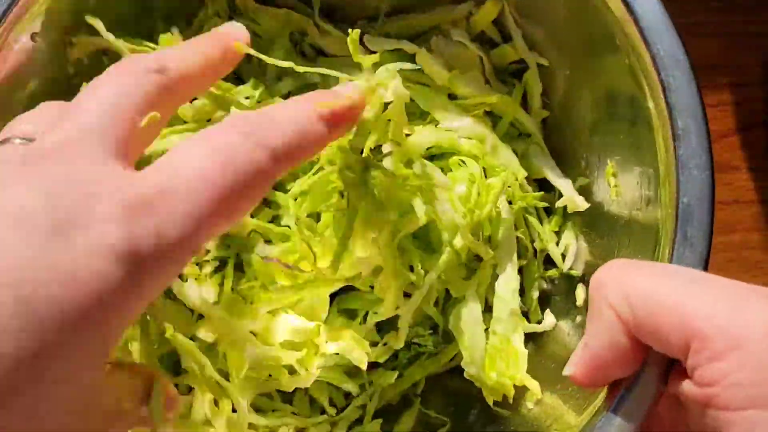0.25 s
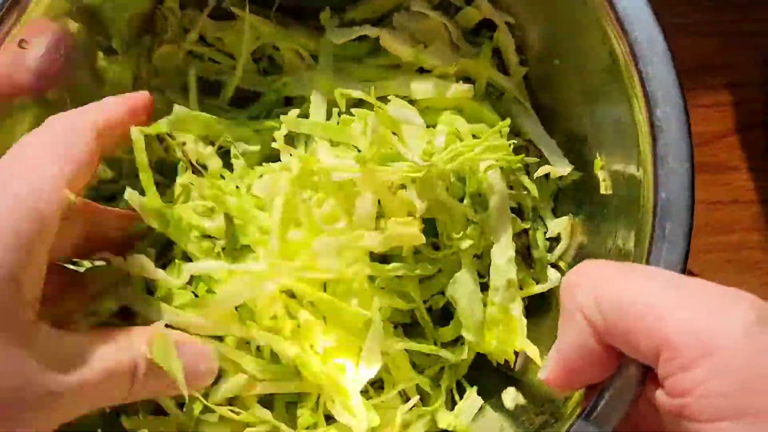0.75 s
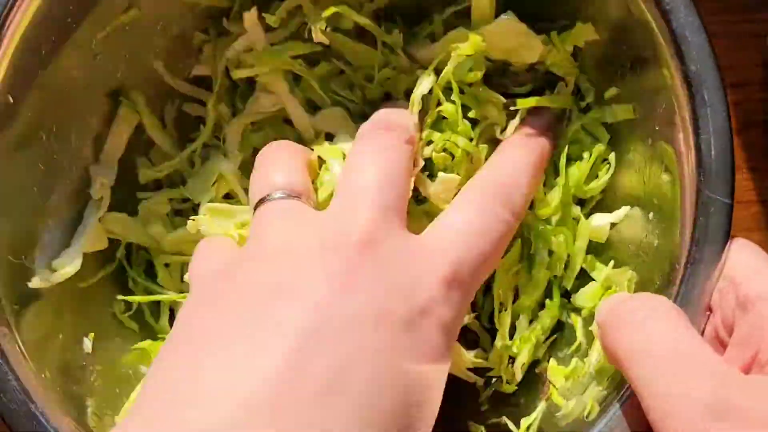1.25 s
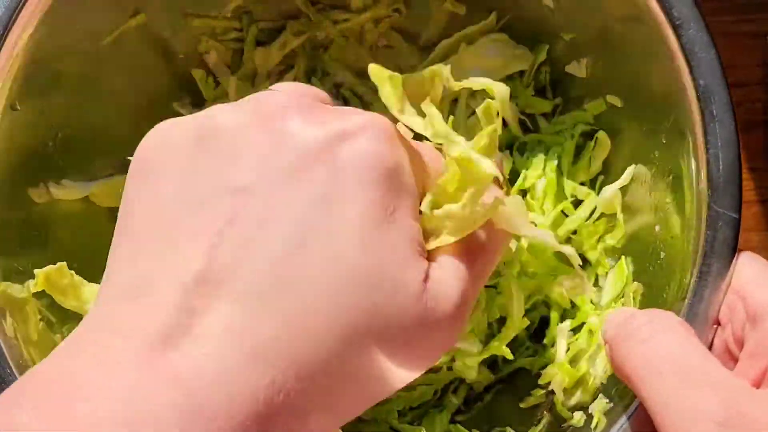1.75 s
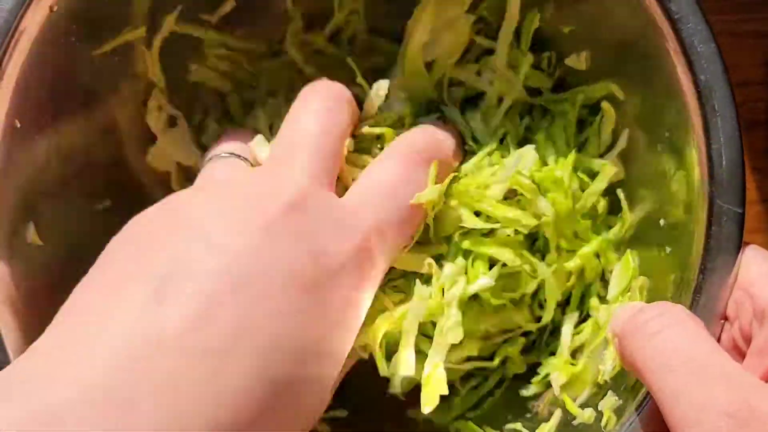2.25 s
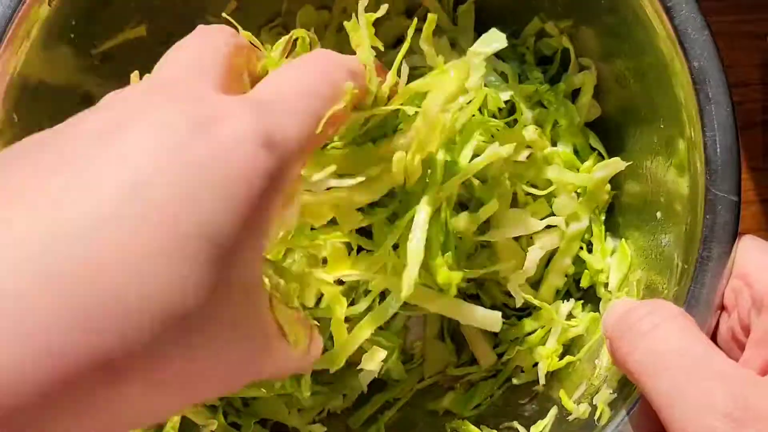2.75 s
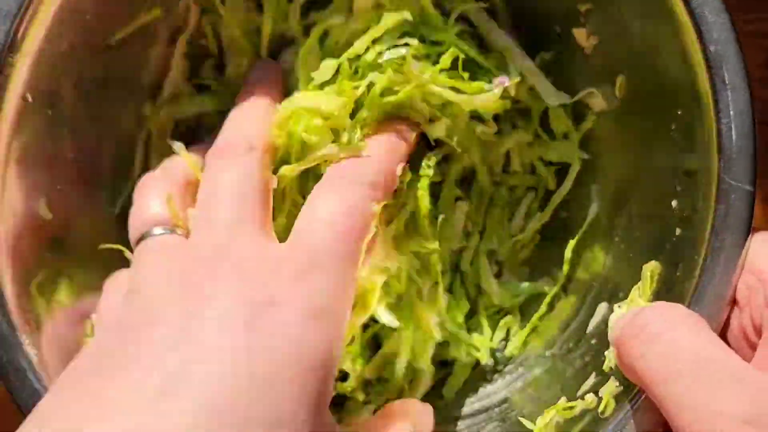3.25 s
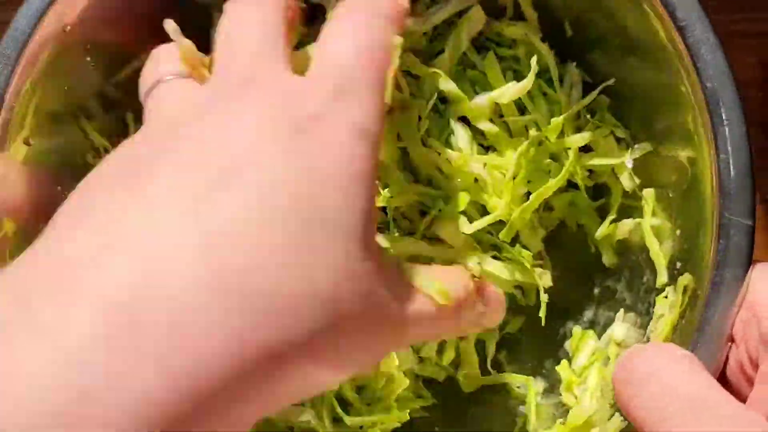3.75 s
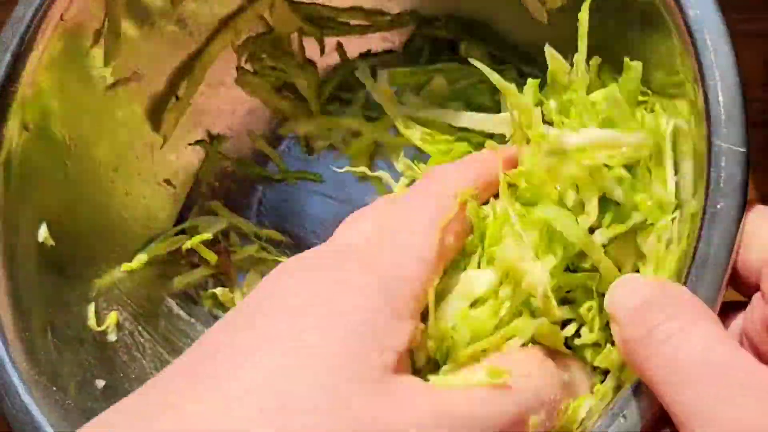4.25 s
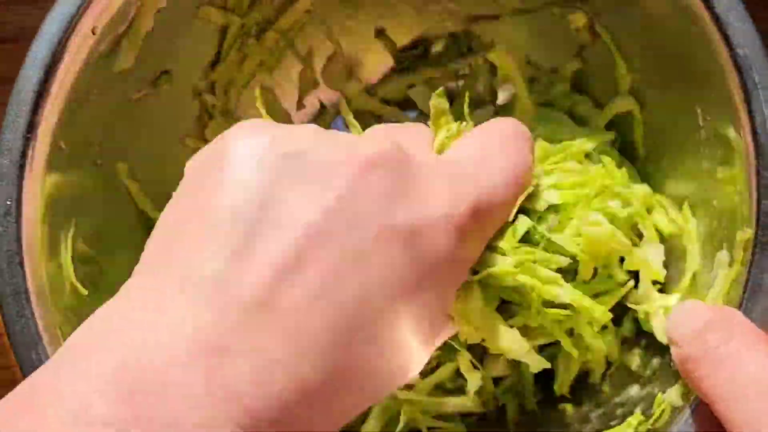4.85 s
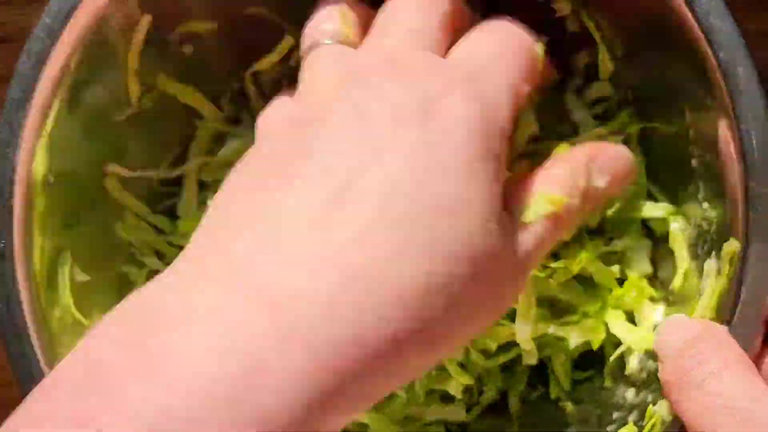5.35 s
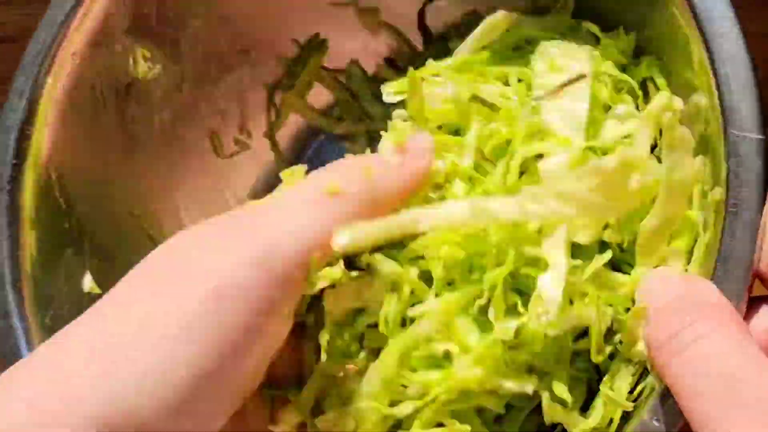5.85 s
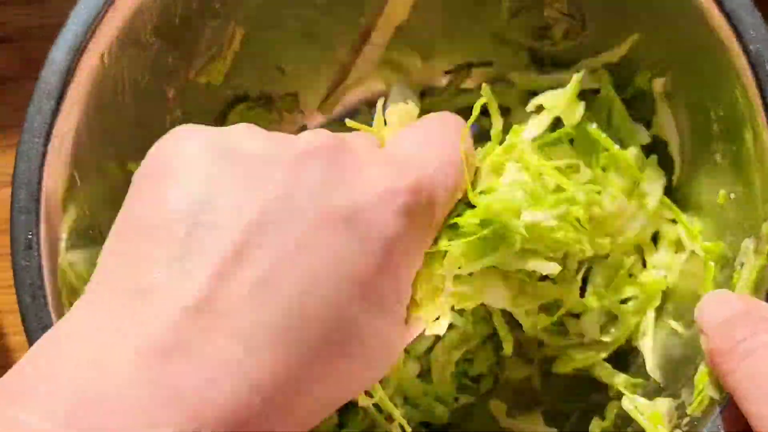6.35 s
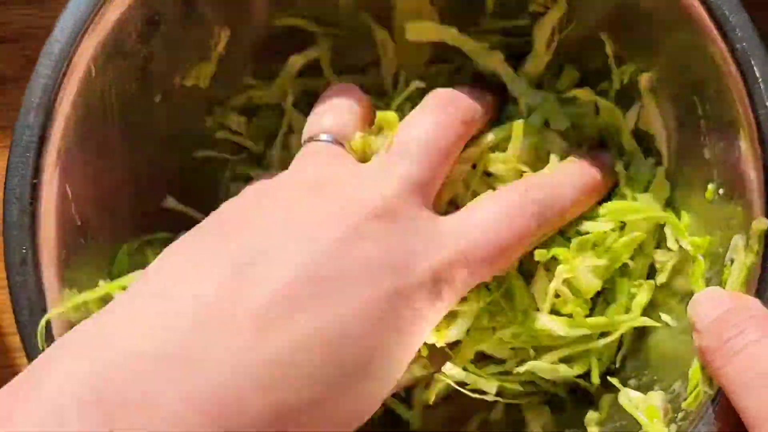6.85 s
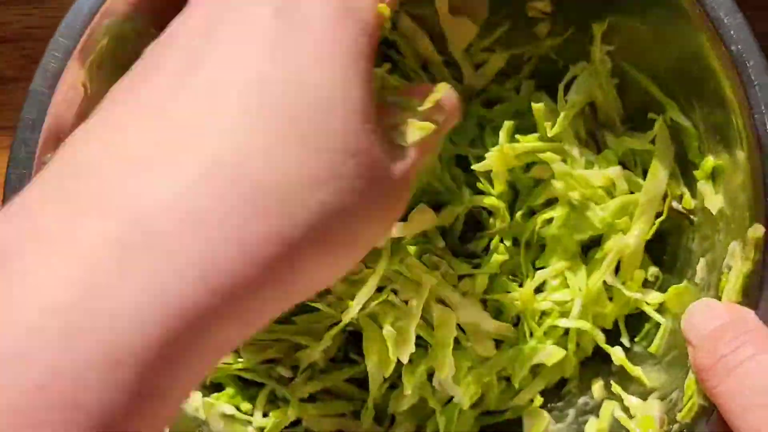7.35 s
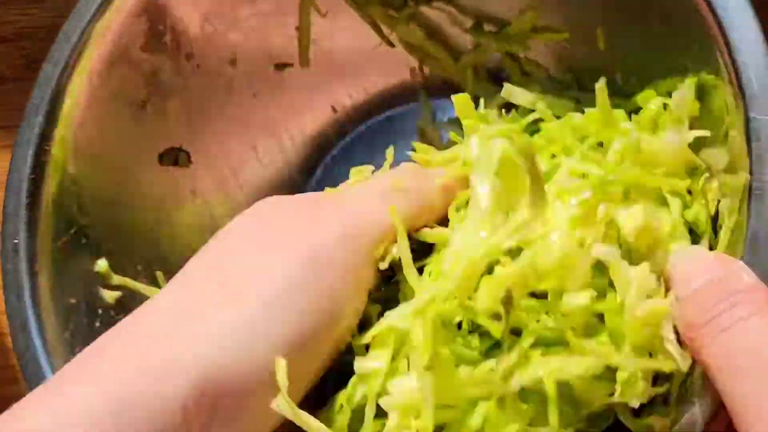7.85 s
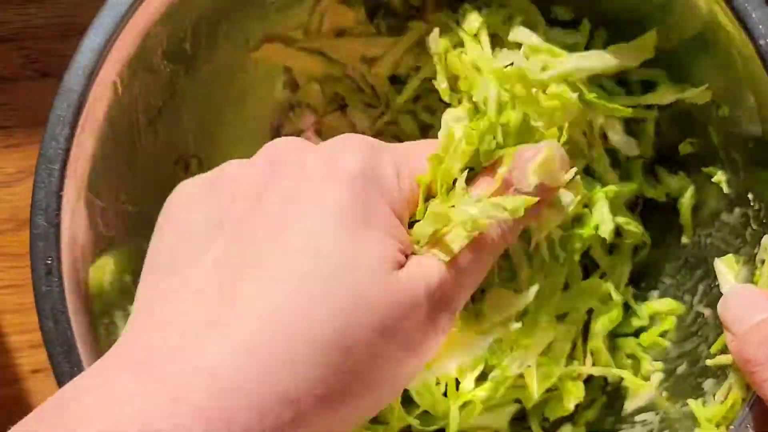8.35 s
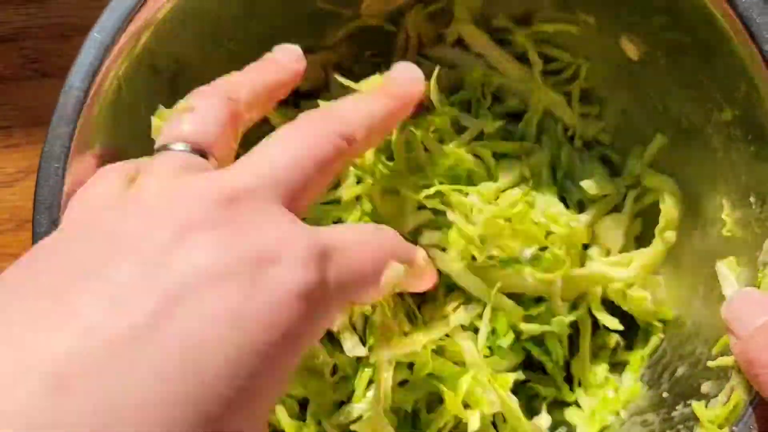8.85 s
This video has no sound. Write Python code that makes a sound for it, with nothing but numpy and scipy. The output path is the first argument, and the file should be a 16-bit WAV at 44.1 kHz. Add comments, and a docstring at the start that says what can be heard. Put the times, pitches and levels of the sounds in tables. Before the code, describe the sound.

In a quiet, faintly humming kitchen, wet cabbage shreds are tossed and squeezed by hand in a metal bowl, heard close up. Light rustling at the start grows busier, alternating with crackly crunches as handfuls are crushed and the ribs break. Clumps drop with little wet slaps, fingers scrape and bump the steel with a damped ring and a couple of tiny squeaks, and the wooden table thumps softly below.

```python
"""First comes a short crunch and scrape over a quiet kitchen hum: a hand is tossing and squeezing
shredded cabbage in a steel bowl on a wooden table, close to a stereo microphone. Wet shreds fizz
as they slide and slap as they fall; under pressure, fibres and ribs fracture and water bubbles out.
Fingers rub, knock and squeak on the steel, exciting its damped modes, and the table thumps below."""
import sys
import numpy as np
from scipy import signal
from scipy.fft import rfft, irfft, next_fast_len
from scipy.io import wavfile
from scipy.ndimage import uniform_filter1d

SR = 44100
rng = np.random.default_rng(int(sys.argv[2]) if len(sys.argv) > 2 else 0)


def digitize_waveform(pressure):
    """Quantize a signal to 16-bit integers and store it at the path in sys.argv[1].

    Rows of a 2-D input are taken as channels; values are limited to [-1, 1].
    """
    field = np.atleast_2d(pressure).T
    bounded = np.clip(field, -1, 1)
    quanta = np.round(bounded * 32767).astype(np.int16)
    wavfile.write(sys.argv[1], SR, quanta)


N = 401751

# The hand digs or turns the heap: (start [s], length [s], rustle [dB], crunch [dB], rub [dB])
HAND_STROKES = [(0.0, .06, -67.5, -54, -53), (0.096, .1, -70.5, -68.5, -66.5), (0.576, .2, -67, -77, -69.5),
                (0.801, .09, -55.5, -63.5, -50.5), (1.009, 0.072, -66.5, -78, -72.5),
                (1.174, 0.019, -71.5, -77, -78.5), (1.263, 0.046, -62.5, -60.5, -57),
                (1.323, .12, -66.5, -65, -57), (1.638, .03, -79.5, -61, -57.5),
                (1.772, .13, -77, -56, -66.5), (2.103, 0.074, -91.5, -71, -73.5),
                (2.198, .04, -65.5, -62, -58), (2.286, .1, -54.5, -56.5, -50.5),
                (2.521, .1, -62, -58.5, -70), (2.643, .06, -65, -61, -62.5),
                (2.966, 0.03005, -89, -72.5, -60), (3.027, .022, -53, -55, -55),
                (3.09, .08, -64, -79, -75.5), (3.236, .05, -66, -67.5, -62.5),
                (3.315, .165, -50.5, -59.5, -49), (3.501, .1, -67.5, -70, -62.5),
                (3.662, .17, -64.5, -70, -63.5), (3.821, .14, -55, -66, -55.5),
                (4.055, .15, -54.5, -61, -60.5), (4.193, .15, -54, -60.5, -45),
                (4.424, 0.037, -71.5, -70, -57.5), (4.464, .09, -51.5, -65, -53.5),
                (4.625, 0.034, -65, -74, -67), (4.714, .1, -53, -65, -52),
                (5.072, 0.064, -57.5, -60, -63.5), (5.29, .055, -55, -67, -61),
                (5.385, .055, -55, -67.5, -59.5), (5.438, 0.11, -56, -67.5, -58.5),
                (5.598, 0.26, -54.5, -66, -58.5), (5.801, .08, -55, -57.5, -48.5),
                (5.957, 0.078, -67, -64.5, -47.5), (6.029, 0.042, -47, -64.5, -52),
                (6.212, .1, -52.5, -63, -52), (6.463, .1, -59.5, -53.5, -62),
                (6.723, 0.035, -68.5, -75.5, -75.5), (6.843, .1, -48, -62.5, -53),
                (7.408, .2, -56.5, -72.5, -58.5), (7.647, 0.052, -56, -71, -62.5),
                (7.973, .03, -66.5, -68.5, -56), (8.041, .03, -61.5, -65, -56),
                (8.438, .07, -62.5, -58, -57), (8.599, 0.11, -84.5, -70.5, -68.5),
                (8.716, .12, -65.5, -71, -67), (8.984, .13, -64.5, -73, -62.5)]
# The fist closes: (tightest at [s], crunch [dB], rustle [dB], rub [dB], lead of the rub's peak [s])
FIST_SQUEEZES = [(0.601, -65.5, -64.5, -62.5, .01), (1.57, -49.5, -60, -52.5, .19),
                 (2.458, -46, -62, -45, .12), (4.891, -45.5, -55, -45, .07),
                 (6.36, -47.5, -61, -50.5, 0.063), (7.05, -49.5, -56, -47, .055),
                 (7.8, -60, -52.5, -52, -0.018), (8.37, -53, -62.5, -53, -.04)]
# Noise spectra: (frequency [Hz], relative density [dB])
RUSTLE_SPECTRUM = [(3500, -103), (5600, -1.5), (6500, 2), (7500, 10), (9000, 3), (11300, -2.5), (14400, 1),
                   (16000, -5)]
CRUNCH_SPECTRUM = [(1000, -27), (2000, -2), (3200, 3.5), (5000, -3.5), (6500, -0.5), (12000, -10)]
KITCHEN_SPECTRUM = [(15, -26), (25, -13), (76, -35), (185, -37), (235, -5), (290, 4), (380, -5.5),
                    (962, -15), (1700, -21.5), (2550, -19.5), (3250, -29.5), (16000, -42)]
SLAP_SPECTRUM = [(3500, -74), (5300, -1), (6200, 6), (7500, 17), (9000, 7), (12000, 2), (16000, -2)]
# Resonances: (centre [Hz], bandwidth [Hz], relative gain [dB])
BOWL_MODES = [(492, 40, -8), (586.7, 20, 5), (682.3, 20, 3), (823, 36, -1), (1090, 36, -1), (1212, 36, 0),
              (1480, 50, -4), (1710, 40, -6), (1900, 34, -6), (2110, 36, -7), (2610, 1020, -19)]  # the damped steel wall
FINGER_BAND = [(975, 2230, 0)]  # soft fingers excite the highest modes less
FOOT_MODES = [(144, 300, -3.5), (240, 111, 11.5), (330, 394, 3)]  # the bowl's foot on the wood
CRACK_BANDS = [(3540, 3400, 4.5), (10200, 22000, 0.5)]  # the noisy edge of dull cracks, then of bright ones
# Fingers and clumps strike the bowl: (time [s], level [dB], pitch [Hz])
BOWL_KNOCKS = [(0.03, -46, 656), (0.09, -55, 590), (0.806, -45.5, 600), (0.854, -39, 576),
               (0.881, -47, 646), (1.135, -57.5, 676), (1.267, -45.5, 322), (1.394, -38.5, 632),
               (1.59, -40.5, 1136), (1.643, -47.5, 850), (2.488, -44.5, 1160), (2.69, -51.5, 676),
               (2.201, -43.5, 350), (2.968, -46.5, 1320), (3.243, -51, 365), (3.029, -35.5, 387),
               (3.319, -36, 640), (3.887, -38.5, 412), (4.052, -45.5, 404), (4.202, -36, 1080),
               (4.2225, -31.5, 724), (4.282, -52, 614), (4.325, -47, 610), (4.347, -40.5, 900),
               (4.489, -44, 590), (4.52, -49, 660), (4.709, -40.5, 380), (4.797, -32.5, 786),
               (4.838, -34.5, 676), (4.934, -42, 620), (5.08, -46.5, 435), (5.294, -47, 352),
               (5.45, -41, 254), (5.611, -43.5, 397), (5.64, -49.5, 268), (5.809, -55, 800),
               (5.863, -41, 590), (5.964, -40.5, 600), (5.976, -55, 670), (6.033, -34, 750),
               (6.061, -48, 910), (6.226, -36, 604), (6.274, -31, 640), (6.688, -50.5, 580),
               (6.845, -39.5, 410), (6.96, -29.5, 1220), (7.0073, -28, 560), (7.035, -51, 646),
               (7.403, -46, 400), (7.653, -44, 407), (7.686, -49, 393), (7.789, -34.5, 634),
               (7.814, -39, 632), (7.838, -46, 640), (7.885, -46.5, 1210), (7.978, -40, 1326),
               (8.048, -44.5, 567), (8.265, -56, 600), (8.398, -43, 654), (8.495, -44.5, 670)]
# Wet clumps slap down or tear loose: (time [s], level [dB])
CLUMP_SLAPS = [(0.814, -32), (1.178, -30.5), (1.263, -33), (1.596, -27), (1.808, -16.5), (2.2, -28.5),
               (3.034, -36), (3.3174, -20.5), (3.412, -33), (3.4557, -24.5), (3.665, -25), (3.684, -26),
               (3.717, -41), (3.752, -27.5), (3.821, -41), (3.887, -22), (4.05, -36), (4.4824, -25.5),
               (4.635, -30), (4.707, -27), (5.013, -24.5), (5.29, -33), (5.449, -27.5), (5.61, -37),
               (5.765, -21.5), (6.042, -17), (6.391, -24), (6.471, -32), (6.728, -30.5), (6.843, -27),
               (7.403, -32.5), (7.652, -38), (8.0475, -30)]
# Weight comes down on the table: (time [s], level [dB])
TABLE_THUMPS = [(0.825, -71), (2.261, -65), (3.451, -67.5), (3.881, -75), (4.065, -68), (4.724, -54),
                (5.314, -66), (5.614, -70), (6.28, -57.5), (6.852, -69), (6.944, -62.5), (7.405, -63),
                (7.667, -68.5)]
# Water escapes from under a clump: (start [s], length [s], level [dB], lowest pitch [Hz])
BUBBLE_RUNS = [(1.266, 0.026, -41.5, 6000), (4.07, 0.032, -43.5, 5700), (5.291, 0.047, -41, 5700),
               (5.619, 0.018, -42, 5550), (7.652, 0.058, -40, 5880)]
# Leaf ribs break: (time [s], level [dB], pitch [Hz])
RIB_CRACKS = [(1.4698, -34, 3450), (1.4877, -30, 3500), (1.5385, -37, 4360), (1.572, -27, 4550),
              (1.5932, -21.5, 3700), (1.642, -32.5, 6400), (1.8096, -19.5, 7100), (2.3538, -36, 3040),
              (2.381, -35, 4500), (2.392, -40, 6000), (2.412, -33, 10000), (2.437, -33, 4860),
              (2.468, -30, 6060), (2.492, -29.5, 4220), (2.563, -36, 4360), (2.58, -49, 12000),
              (2.611, -46, 6000), (3.03, -29.5, 5970), (3.031, -33.5, 2470), (3.32, -27.5, 6150),
              (3.435, -31.5, 3280), (4.8033, -26.5, 7800), (4.8247, -31, 3420), (4.8532, -25, 3130),
              (4.887, -33, 3860), (4.9, -29.5, 2440), (4.9656, -27.5, 6540), (5.005, -26, 3760),
              (5.009, -34, 7000), (5.018, -27, 6100), (5.085, -38.5, 7360), (6.275, -32, 2530),
              (6.3783, -25.5, 3270), (6.3905, -21.5, 7100), (6.472, -29.5, 3540), (6.9503, -35.5, 1900),
              (7.043, -32, 3520), (7.048, -27.5, 4800), (7.061, -38, 6400), (7.066, -31, 2650),
              (7.1045, -30.5, 5400), (8.3585, -21, 6540), (8.3577, -19, 4060), (8.3863, -30, 3020),
              (8.4455, -31.5, 3180)]
# Wet fingertips chatter on steel: (start [s], length [s], level [dB], lowest pitch [Hz])
FINGER_SQUEAKS = [(2.315, 0.038, -29.5, 1450), (4.128, .022, -36, 1450)]
# The room's reverberation: (frequency [Hz], time to fall 60 dB [s])
ROOM_DECAY = [(300, 0.079), (3000, 0.044), (12000, 0.0027)]

SIZE_FLOOR = .03  # limits the size of the biggest random grains


def amp(db):
    """Amplitude ratio of a level in decibels."""
    return 10 ** (np.asarray(db) / 20)


def along(points, hz):
    """Interpolation of (frequency, value) points on a logarithmic frequency axis."""
    f, v = np.transpose(points)
    return np.interp(np.log(hz + 1), np.log(f + 1), v)


def filtered(x, response):
    """Linear filtering, normalised so that white noise keeps its power."""
    m = next_fast_len(N + SR // 2)
    h = response(np.fft.rfftfreq(m, 1 / SR))
    return irfft(rfft(x, m) * h / np.sqrt(np.mean(np.abs(h) ** 2)), m)[..., :N]


def colour(points):
    """Zero-phase response of a smooth spectrum."""
    return lambda hz: amp(along(points, hz))


def modes(table):
    """Modal superposition: second-order resonators summed with alternating sign."""
    return lambda f: sum((-1) ** k * amp(db) * 1j * f * width / (hz * hz - f * f + 1j * f * width)
                         for k, (hz, width, db) in enumerate(table))


def nearest_mode(hz):
    """The bowl's natural frequency closest to each pitch."""
    tones = np.transpose(BOWL_MODES)[0]
    return tones[np.abs(np.log(hz[:, None] / tones)).argmin(axis=1)]


def stereo_noise(correlation):
    """Partially coherent white noise in two channels."""
    mid, side = rng.standard_normal((2, N))
    angle = np.arccos(correlation) / 2
    return np.cos(angle) * mid + np.sin(angle) * side * np.array([[1], [-1]])


def placed(x, lag_s, left_db):
    """Path difference: the left channel lags, by one cycle at most, and is left_db above the right."""
    m = next_fast_len(N + 512)
    lag_cycles = np.minimum(np.fft.rfftfreq(m, 1 / SR) * lag_s, 1)
    left = irfft(rfft(x[0], m) * np.exp(-2j * np.pi * lag_cycles), m)[:N]
    return np.array([left * amp(left_db / 2), x[1] * amp(-left_db / 2)])


def unit(x):
    """Normalisation to rms 1."""
    return x / np.sqrt(np.mean(x ** 2) + 1e-20)


def grains(per_s, spread_db, t60, steady, rise_s):
    """Shot-noise envelope of rms 1: random pulses of uneven size over a steady share."""
    chance, size = rng.random((2, N))
    kicks = (chance < per_s / SR) * amp(-spread_db * np.log(size + SIZE_FLOOR))
    decaying = signal.lfilter([1], [1, -amp(-60 / (t60 * SR))], kicks)
    rounded = signal.lfilter([1], [1, -np.exp(-1 / (rise_s * SR))], decaying)
    return unit(steady + unit(rounded))


def bursts(times, dbs, t60, rise_s, stretch=0.88):
    """Envelope of sudden onsets with stretched-exponential decay."""
    out, t = np.zeros(N + SR), np.arange(SR // 4) / SR
    for s, db in zip(times, dbs):
        out[round(s * SR):][:len(t)] += amp(db - 60 * (t / t60) ** stretch) * (1 - np.exp(-t / rise_s))
    return out[:N]


def pings(times, dbs, hz, cycles, rise):
    """Damped oscillators that lose 60 dB in so many cycles; the rise is also in cycles."""
    hz = np.asarray(hz)[:, None]
    k = np.arange(int(cycles * SR / hz.min()) + 2)
    turns = k * hz / SR
    envelope = amp(dbs[:, None] - 60 * turns / cycles) * (1 - np.exp(-turns / rise))
    wave = envelope * np.sin(2 * np.pi * turns)
    at = np.round(times * SR).astype(int)[:, None] + k
    return np.bincount(at.ravel(), wave.ravel(), N + len(k) + SR)[:N]


def patter(drive, hz, octaves, db, spread_db, cycles, count, tune=np.asarray):
    """A random point process of pings, denser and bigger as the drive grows."""
    when, size = rng.random((count, 2)).T
    activity = np.cumsum(drive ** .8)
    at = np.searchsorted(activity, when * activity[-1])
    size_db = db - spread_db * np.log(size + SIZE_FLOOR) + 20 * np.log10(drive[at])
    pitch = tune(hz * 2 ** np.clip(octaves * rng.standard_normal(count), -1, 1))
    return pings(at / SR, size_db, pitch, cycles, rise=0.44)


def runs(table, fall, scatter, cycles, count):
    """Fading runs of damped oscillations, scattered above each row's pitch and sinking by a share."""
    start, length, db, hz = np.transpose(table)[:, :, None]
    progress = rng.random((len(start), count))
    detune, size = rng.standard_normal((2, len(start), count))
    pitch = hz * (1 + fall * np.exp(-4 * progress) + np.minimum(scatter * abs(detune), 1))
    levels = db - 6 * progress + 3 * size
    return pings((start + length * progress).ravel(), levels.ravel(), pitch.ravel(), cycles, rise=0.71)


def swell(t, rise, fall, round_s):
    """Exponential growth and decay [dB/s] about a rounded peak at t = 0."""
    return amp(-np.where(t < 0, rise, fall) * (np.hypot(t, round_s) - round_s))


def hand():
    """Incoherent addition: strokes, squeezes and the settling heap sum in power to three gains."""
    t = np.arange(N) / SR
    attack_s, sag_db_per_s, release_db_per_s = .002, 30, 240
    power = np.ones((3, N)) * amp([[-83.5], [-80], [-73.5]]) ** 2  # rustle, crunch, rub at rest
    for s, length, *dbs in HAND_STROKES:
        at = slice(round(s * SR), round((s + length) * SR) + SR // 3)
        age = t[at] - s
        fade = amp(-sag_db_per_s * age - release_db_per_s * np.maximum(age - length, 0))
        power[:, at] += (amp(dbs)[:, None] * np.clip(age / attack_s, 0, 1) * fade) ** 2
    for s, crunch_db, rustle_db, rub_db, lead in FIST_SQUEEZES:
        at = slice(max(round(s * SR) - SR // 2, 0), round(s * SR) + SR // 2)
        grip = swell(t[at] - s, rise=140, fall=120, round_s=0.02)
        press = swell(t[at] - s + lead, rise=160, fall=140, round_s=0.03)
        power[:, at] += (amp([[rustle_db], [crunch_db], [rub_db]]) * [grip, grip, press]) ** 2
    return np.sqrt(power)


def sliding_shreds(rustle, crunch):
    """Friction between wet shreds radiates a bright fizz of noise and tiny ticks."""
    crackle = grains(per_s=160, spread_db=6.5, t60=0.046, steady=0.79, rise_s=0.0023)
    fizz = filtered(rustle * amp(2) * crackle * stereo_noise(0.91), colour(RUSTLE_SPECTRUM))
    ticks = patter(rustle, 8050, octaves=0.12, db=-1, spread_db=4.5, cycles=20, count=900)
    fine_ticks = patter(crunch, 11100, octaves=0.35, db=1, spread_db=5.5, cycles=6.5, count=1200)
    return fizz + ticks + fine_ticks


def breaking_fibres(crunch):
    """Brittle fracture: squeezed fibres break one by one, and their pulses merge into a crunch."""
    breaks = grains(per_s=580, spread_db=5, t60=0.015, steady=0.8, rise_s=0.0003)
    noise = filtered(crunch * amp(1.5) * breaks * stereo_noise(0.05), colour(CRUNCH_SPECTRUM))
    return noise + patter(crunch, 3600, octaves=0.41, db=1.5, spread_db=7, cycles=9.4, count=2200)


def bowl_wall(rub, slips):
    """Modal response: stick-slip rubbing, knocks and falling shreds ring the steel wall."""
    s, db, hz = np.transpose(BOWL_KNOCKS)
    cutoff_hz, ring_cycles = 470, 42  # the wall hardly sounds below its lowest mode

    def response(f):
        return modes(BOWL_MODES)(f) * modes(FINGER_BAND)(f) / (1 + (cutoff_hz / (f + 1)) ** 10)

    force = slips + bursts(s, db + 7.5, t60=0.0086, rise_s=0.00018)
    body = filtered(force * stereo_noise(0.41), response)
    knocks = pings(s, db + 8, hz, cycles=8.8, rise=0.54)
    ring_db = db - 2 - 8.5 * (hz < cutoff_hz)  # soft, low knocks ring less
    ring = pings(s, ring_db, nearest_mode(hz), ring_cycles, rise=2.2)
    shreds = patter(rub, 720, octaves=0.4, db=-2, spread_db=2.5, cycles=ring_cycles, count=500,
                    tune=nearest_mode)
    return body + knocks + ring + shreds


def bowl_foot(slips):
    """Mechanical coupling: low knocks, and faintly the rubbing, push the bowl's foot on the wood."""
    s, db, hz = np.transpose(BOWL_KNOCKS)
    corner_hz, db_per_octave = 339, 30.7
    push_db = db - 1.5 - db_per_octave * np.maximum(np.log2(hz / corner_hz), 0)
    force = bursts(s, push_db, t60=0.16, rise_s=0.000066) + amp(-34.5) * slips
    return filtered(force * stereo_noise(1), modes(FOOT_MODES))


def kitchen_hum(work):
    """Ambient noise: a far hum, hiss and low tremble; this background dips while the crunching and rubbing are
    loud."""
    dip_db, half_dip_at_db = 9, -52.5
    loudness = uniform_filter1d(work, SR) / amp(half_dip_at_db)  # one-second average
    hum = amp(-64) * filtered(stereo_noise(0.63), colour(KITCHEN_SPECTRUM))
    tremble = amp(-73.5) * filtered(stereo_noise(0.73), modes([(62.3, 14, 0)]))
    return amp(-dip_db * loudness / (1 + loudness)) * (hum + tremble)


def slapping_clumps():
    """Impulsive excitation: a wet clump lands or tears loose in a burst of bright noise."""
    s, db = np.transpose(CLUMP_SLAPS)
    envelope = bursts(s, db - 14, t60=0.09, rise_s=0.00039, stretch=0.92)
    return filtered(envelope * stereo_noise(0.37), colour(SLAP_SPECTRUM))


def table_thumps():
    """Free vibration of a plate: suddenly loaded, the table top gives a low tone and a dull thud."""
    s, db = np.transpose(TABLE_THUMPS)
    hz = 72.8 * amp(rng.normal(0, 0.084, len(s)))
    tone = pings(s, db + 19, hz, cycles=16.1, rise=0.49)
    thud = bursts(s, db + 10.5, t60=0.44, rise_s=0.013) * stereo_noise(0.37)
    return tone + filtered(thud, modes([(90, 340, 0)]))


def bubbles():
    """Bubble resonance: water squeezed from under a clump sounds a run of tiny, high pings."""
    return runs(BUBBLE_RUNS, fall=0.024, scatter=0.12, cycles=36, count=50)


def cracking_ribs():
    """Sudden release of strain: a leaf rib breaks with a damped tone and a broadband edge."""
    s, db, hz = np.transpose(RIB_CRACKS)
    bright = hz >= 5000
    cracks = pings(s, db + 5, hz, cycles=20, rise=0.9)
    for kind, (centre, width, edge_db) in zip([~bright, bright], CRACK_BANDS):
        edge = bursts(s[kind], db[kind] + edge_db - 9, t60=0.021, rise_s=0.000085)
        cracks = cracks + filtered(edge * stereo_noise(0.16), modes([(centre, width, 0)]))
    return cracks


def squeaks():
    """Stick-slip friction: wet fingertips chatter along the steel."""
    return runs(FINGER_SQUEAKS, fall=0, scatter=0.29, cycles=18, count=30)


def reverberation(x):
    """A diffuse field: after a short delay, each frequency decays exponentially at its own rate."""
    hz, t, spectrum = signal.stft(rng.standard_normal((2, SR // 3)), SR, nperseg=256)
    decay = amp(-60 * t / along(ROOM_DECAY, hz)[:, None])
    tail = signal.istft(spectrum * decay, SR, nperseg=256)[1]
    delayed = np.pad(x, ((0, 0), (200, 0)))
    return signal.fftconvolve(delayed, tail / np.linalg.norm(tail[0]), axes=1)[:, :N]


def scene():
    """Superposition: cabbage and bowl, to the right and with a little room, over table and kitchen."""
    rustle, crunch, rub = hand()
    slips = rub * grains(per_s=140, spread_db=3, t60=0.023, steady=1, rise_s=0.00026)
    wet = sliding_shreds(rustle, crunch) + slapping_clumps() + bubbles()
    crisp = breaking_fibres(crunch) + cracking_ribs()
    steel = bowl_wall(rub, slips) + squeaks()
    near = placed(wet, lag_s=0.000136, left_db=-4.5) + placed(crisp, lag_s=0.000136, left_db=-2.5)
    near += placed(steel, lag_s=0.00027, left_db=-3) + placed(bowl_foot(slips), lag_s=0.00062, left_db=0)
    return near + amp(-9) * reverberation(near) + table_thumps() + kitchen_hum(crunch + rub)


def record(dry):
    """Gating and band limiting: the sound drops out once, briefly, and the highest treble is cut."""
    gap_start_s, gap_end_s, ramp_s, top_hz = .794, .799, .0015, 16000
    t = np.arange(N) / SR
    gate = np.clip(np.maximum(gap_start_s - t, t - gap_end_s) / ramp_s, 0, 1)
    m = next_fast_len(N)
    passband = np.fft.rfftfreq(m, 1 / SR) < top_hz
    return irfft(rfft(dry * gate, m) * passband, m)[:, :N]


dry = scene()
out = record(dry)
digitize_waveform(out)
```